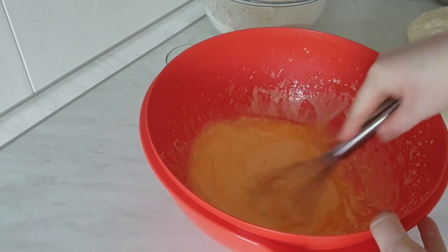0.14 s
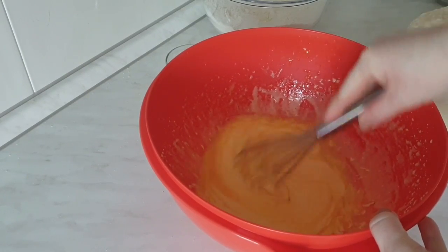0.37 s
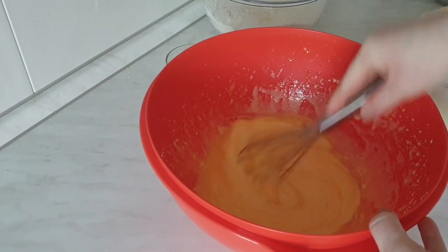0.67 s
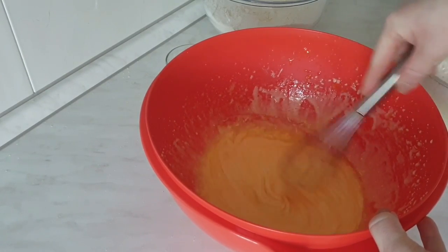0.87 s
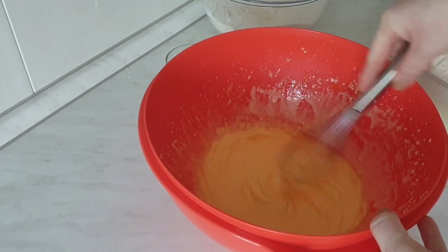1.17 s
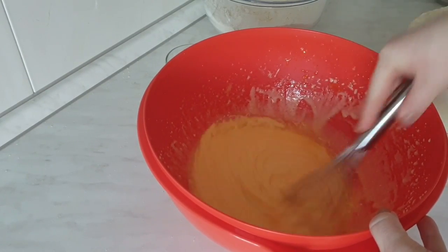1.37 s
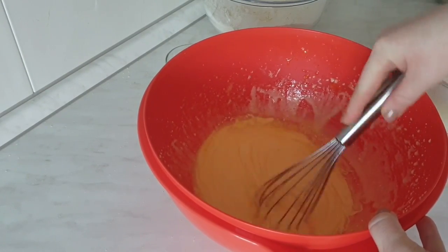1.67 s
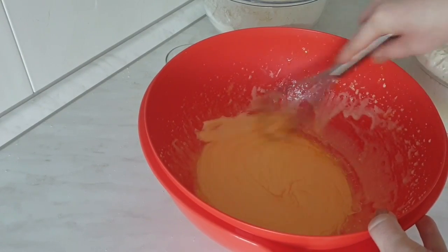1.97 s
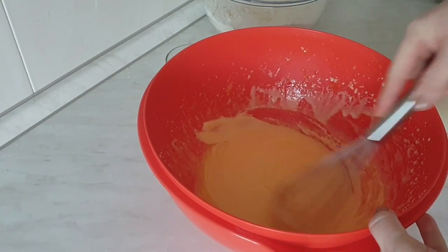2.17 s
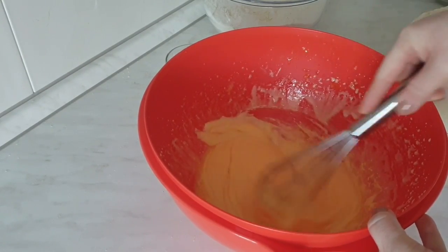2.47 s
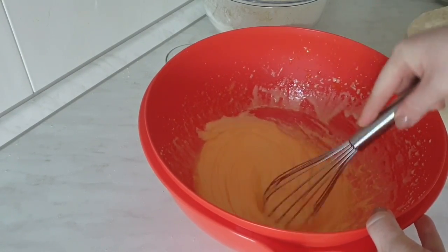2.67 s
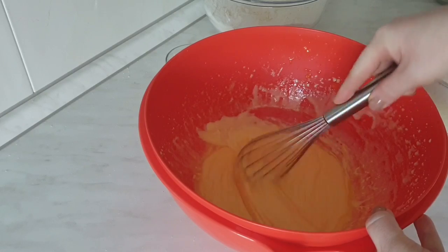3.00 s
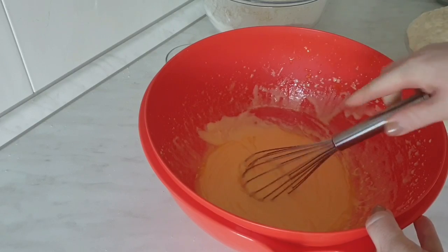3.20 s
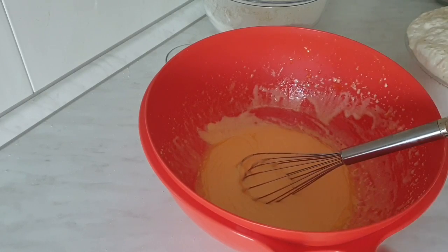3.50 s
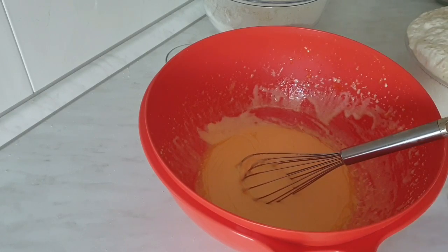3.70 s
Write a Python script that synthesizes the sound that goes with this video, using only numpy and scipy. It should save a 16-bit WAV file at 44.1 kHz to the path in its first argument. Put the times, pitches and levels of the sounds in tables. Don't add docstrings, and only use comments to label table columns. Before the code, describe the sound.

Close stereo pickup in a small, hard-walled kitchen: continuous raspy whisking round a plastic bowl, hollow bumps beneath, then sparse drags and taps, finally a hard double clack as the whisk drops, leaving faint hum.

```python
import sys
import numpy as np
from scipy import signal
from scipy.io import wavfile

SR = 44100
rng = np.random.default_rng(int(sys.argv[2]) if len(sys.argv) > 2 else 0)


def gain_from_decibels(decibels):
    exponent = np.asarray(decibels, float) / 20
    return 10 ** exponent


def master_out(mix):
    frames = np.transpose(np.atleast_2d(mix))
    ceiling = np.clip(frames, -1, 1)
    pcm = np.round(ceiling * 32767).astype(np.int16)
    wavfile.write(sys.argv[1], SR, pcm)


N = 169785

# frequency_hz, level_db, t60_s
BOWL_MODES = [(78, -14.5, 0.42), (135, 1, 0.11), (174.6, -8, .08), (269.7, -11, 0.19), (345, -1, 0.083),
              (409, -1.5, 0.099), (480, 0, 0.046), (1029, -5, 0.082), (721, -6.5, .07), (920.7, 6, 0.033),
              (1214, -5, 0.048), (1472, 7.5, 0.021), (1928, -4.5, 0.042), (2400, -5.5, 0.037)]
# frequency_hz, likeness (1 = identical)
CORRELATION = [(60, 1), (140, 0.8), (250, 1), (600, 0.44), (1500, 0.37), (8000, 0.12)]
# frequency_hz, left_over_right_db
BALANCE = [(60, 0.5), (140, 2.5), (250, -0.5), (600, 2), (3000, 0.5), (15000, 1)]
SIDES = np.array([[1], [-1]])
BAND_EDGES_HZ = 40 * 2 ** np.arange(0, 8.9, .5)


def rms_one(x):
    return x / np.sqrt(np.mean(x ** 2) + 1e-20)


def at_hz(points, hz):
    table = np.array(points)
    return np.interp(np.log(hz), np.log(table[:, 0]), table[:, 1])


def drift(rate_hz):
    pole = np.exp(-80 * np.pi * rate_hz / SR)
    noise = rng.standard_normal(N // 40 + 2002)
    slow = signal.lfilter([1], [1, -2 * pole, pole * pole], noise)[2000:]
    return np.interp(np.arange(N) / 40, np.arange(len(slow)), rms_one(slow))


def ring(x, hz, t60_s):
    radius = gain_from_decibels(-60 / (t60_s * SR))
    angle = 2 * np.pi * hz / SR
    return signal.lfilter([0, np.sin(angle)], [1, -2 * radius * np.cos(angle), radius * radius], x + 1e-18)


def to_sides(mid, side, hz):
    alike = np.clip(at_hz(CORRELATION, hz), -1, 1)
    lean = gain_from_decibels(at_hz(BALANCE, hz) / 2 * SIDES)
    return lean * (np.sqrt(1 + alike) * mid + np.sqrt(1 - alike) * side * SIDES)


def bands(source, gain_db):
    out = 0
    for k, (low, high) in enumerate(zip(BAND_EDGES_HZ, BAND_EDGES_HZ[1:])):
        band = signal.butter(2, [low, high], "band", fs=SR, output="sos")
        mid, side = signal.sosfilt(band, source[k % 2])
        hz = np.sqrt(low * high)
        out = out + gain_from_decibels(gain_db(hz)) * to_sides(mid, side, hz)
    return out


def whisk():
    # touch_s, hardest_s, lift_s, level_db, softer_at_touch_db, softer_at_lift_db
    sweeps = [(-.01, 0, 0.16, -33.5, 0, 3), (.165, .28, 0.35, -31, 0.5, 10),
              (.345, .385, 0.44, -35, -2, -1), (.45, .57, .67, -31, 0, 3.5), (.67, .71, 0.74, -28, 6.5, -1),
              (.765, .86, 0.98, -27.5, 0.5, 15), (.95, 1.035, 1.038, -25.5, 8, -14),
              (1.075, 1.14, 1.23, -24.5, 2, 8.5), (1.23, 1.42, 1.587, -26, 6.5, 10),
              (1.545, 1.585, 1.737, -31, 14, 1), (1.65, 1.70, 1.696, -27.5, 14, -5)]
    drags = [
        (1.947, 1.989, 2.02, -32.5, 2, 2.5),
        (2.014, 2.063, 2.112, -18.5, 6.5, 2.5),
        (2.135, 2.135, 2.196, -25.5, -1, 0),
        (2.401, 2.455, 2.494, -29, -4, 9.5),
        (2.686, 2.721, 2.74, -32.5, -2.5, -3),
        (2.945, 2.982, 3, -29.5, -5.5, 8),
        (3.137, 3.145, 3.1616, -31, -3, 5.5),
        (3.77, 3.792, 4.6, -59, -4, 6),
    ]
    # (s, s, s, dB, dB, dB)
    slides = [
        (3.275, 3.32, 3.354, -49.5, 26, 14.5),
        (3.125, 3.15, 3.177, -42, -2.5, 8.5),
    ]
    # frequency_hz, density_db (per Hz)
    rasp_spectrum = [(59, -55.5), (100, -24), (224, -17), (358, -3), (662, 2.5), (1480, 0.5), (4020, -1.5),
                     (11400, -6), (16000, -15.5)]
    rub_db, slide_rub_db = -11, -9.5
    brightens, flutter_db, patchy_db = 0.31, 1.8, 1.0
    fleck_db, slide_hz = -13, 920

    press = contact(sweeps + drags)
    effort_db = 20 * np.log10(press + 1e-4) + 35
    slips, shared_db = grains(), drift(25)

    def rasp_db(hz):
        brightness = brightens * effort_db * np.log2(hz / 3000) / 2
        patches = patchy_db * drift(11) + flutter_db * drift(30)
        return at_hz(rasp_spectrum, hz) + brightness + shared_db + patches

    def rub_force(k, hz):
        return slips[k % 2, 0] * gain_from_decibels(2.5 * drift(11.7) - 5.8 * (hz < 200))

    rasp = rms_one(bands(slips, rasp_db)) + gain_from_decibels(fleck_db) * flecks()
    rub = rms_one(body(rub_force))
    dull = rms_one(signal.sosfilt(signal.butter(3, slide_hz, fs=SR, output="sos"), rasp))
    strokes = press * (rasp + gain_from_decibels(rub_db) * rub)
    sliding = contact(slides) * (dull + gain_from_decibels(slide_rub_db) * rub)
    return strokes + sliding + flares(slips)


def contact(rows):
    t, edge_s = np.arange(N) / SR, 0.0025
    gain = 0
    for touch, hardest, lift, db, soft_db, eased_db in rows:
        level_db = np.interp(t, [touch, hardest, lift], [db - soft_db, db, db - eased_db])
        gate = np.clip(np.minimum(t - touch, lift - t) / edge_s + .5, 0, 1)
        gain = gain + gain_from_decibels(level_db) * gate
    return gain


def grains():
    shape, slips_per_s, spread_db = (2, 2, N), 7000, 3.0
    sizes = gain_from_decibels(spread_db * np.minimum(rng.exponential(1, shape), 5)) * rng.choice([-1, 1], shape)
    return rms_one(sizes * (rng.random(shape) < slips_per_s / SR))


def flecks():
    per_s, ring_cycles = 400, 45
    pitches_hz = np.geomspace(1710, 5420, 24)
    born = (rng.random(N) < per_s / SR) * gain_from_decibels(2.9 * np.minimum(rng.exponential(1, N), 3))
    dealt = rng.integers(0, 24, N)
    lean = rng.uniform(-1, 1, (2, N))
    out = 0
    for k, hz in enumerate(pitches_hz):
        push = ring(born * lean * (dealt == k), hz, 8 / hz)
        out = out + ring(push, hz, ring_cycles / hz) * hz
    return rms_one(out)


def flares(slips):
    # start_s, length_s, pitch_hz, level_db
    moments = [(0.234, 0.043, 3190, -41.5), (0.552, 0.029, 3040, -35.5), (0.557, 0.017, 1950, -40),
               (0.999, 0.043, 3206, -34), (1.139, 0.046, 4050, -40), (1.159, 0.056, 1920, -44.5),
               (1.328, .16, 3940, -40), (1.397, 0.02, 1440, -40), (1.559, 0.034, 4000, -40),
               (1.939, 0.11, 1370, -32), (2.08, 0.097, 1597, -35), (2.686, 0.031, 4070, -44.5),
               (2.695, 0.0083, 3060, -34), (2.689, 0.02, 640, -38.5), (3.278, 0.13, 1260, -66.5),
               (3.263, 0.17, 2258, -66.5), (0.978, 0.085, 480, -41), (1.25, 0.031, 469, -43.5)]
    sharpness = 21
    out = np.zeros((2, N))
    for s, length, hz, db in moments:
        a, b = int(s * SR), int((s + length) * SR)
        tone = ring(slips[0, :, a:b], hz, sharpness / hz)
        tone = ring(tone, hz, sharpness / hz)
        swell = np.sin(np.linspace(0, 3, b - a)) ** .5
        out[:, a:b] += gain_from_decibels(db) * rms_one(tone) * swell
    return out


def knocks():
    # start_s, peak_db, favoured_pitch_hz, crack_db (against the thud)
    blows = [(.104, -30, 428, -40), (.174, -29, 338, -40), (.455, -35, 460, -27), (.773, -21, 338, -40),
             (1.07, -23, 356, -40), (0.958, -33, 127, -45), (1.074, -29, 135, -45),
             (1.346, -22.5, 158.5, -43), (1.355, -26, 862, -30), (1.655, -19.5, 421, -43),
             (1.66, -32, 135, -45), (1.899, -45.5, 324, -15), (2.056, -16.5, 151, -34),
             (2.389, -29, 1050, -6.5), (2.415, -29, 126, -45), (2.289, -39, 121.4, -45),
             (2.687, -21.5, 644, -14), (2.804, -38.5, 125, -48.5), (2.899, -29, 1000, -7),
             (2.975, -28, 507, -35), (3.098, -27.5, 454, -20.5), (3.144, -28.5, 130, -46),
             (3.3818, -9.5, 950, -8.5), (3.384, -9.5, 151.6, -39), (3.385, -10.5, 409, -39),
             (3.436, -14, 650, -15), (3.459, -20, 80, -53), (3.455, -22.5, 449.3, -31.5),
             (3.49, -32.5, 400, -33.5), (3.798, -50, 2400, -5.5)]
    spot_octaves, spot_widens, spot_loss_db = 0.28, 0.027, 18.5
    knock_db, uneven_db, contact_cycles = -3, 1.5, 3.5
    crack_s, crack_hz = .004, [2000, 12000]

    s, db, spot_hz, crack_db = np.transpose(blows)
    at = (s * SR).astype(int)
    luck_db = rng.normal(0, uneven_db, (len(s), len(BOWL_MODES)))
    wide = spot_octaves + spot_widens * np.clip(db + 21.5, 0, None)

    def force(k, hz):
        clicks = np.zeros(N)
        loss_db = spot_loss_db * np.tanh((np.log2(hz / spot_hz) / wide) ** 2)
        clicks[at] = gain_from_decibels(db + knock_db + luck_db[:, k] - loss_db)
        push = ring(clicks, hz, contact_cycles / hz)
        return push * 2 * np.log(1000) * hz / contact_cycles / SR

    ticks = np.zeros(N)
    ticks[at] = gain_from_decibels(db + crack_db)
    decay = signal.lfilter([1], [1, -np.exp(-1 / (crack_s * SR))], ticks + 1e-18)
    burst = decay * rng.standard_normal((2, N))
    crack = signal.sosfilt(signal.butter(1, crack_hz, "band", fs=SR, output="sos"), burst)
    return body(force) + crack


def body(force):
    out = np.zeros((2, N))
    for k, (hz, db, t60) in enumerate(BOWL_MODES):
        tone = gain_from_decibels(db) * ring(force(k, hz), hz, t60)
        late = np.concatenate([np.zeros(int(SR / hz / 4)), tone])[:N]
        out += to_sides(tone, late * (-1) ** k, hz)
    return out


def kitchen(x):
    # frequency_hz, t60_s
    decay_times = [(100, 0.44), (500, 0.34), (2000, 0.33), (6000, 0.33), (14000, 0.29)]
    # frequency_hz, level_db
    colour = [(60, -6.5), (200, -6.5), (500, -0.5), (2000, 2), (14000, -5)]
    first_echo_s = 0.0019
    t = np.arange(int(.7 * SR)) / SR
    noise = rng.standard_normal((2, 2, len(t)))
    tail = bands(noise, lambda hz: at_hz(colour, hz) - 60 * t / at_hz(decay_times, hz))
    tail = tail * np.clip(t / first_echo_s - 1, 0, 1)
    tail /= np.sqrt(np.sum(tail ** 2) / 2)
    return signal.fftconvolve(x, tail, axes=1)[:, :N]


def house_hum():
    # frequency_hz, density_db (per Hz)
    hum_spectrum = [(40, 2), (75, -3.5), (125, -2), (200, -11.5), (950, -17), (1300, -27), (4800, -42.5),
                    (15000, -29.5)]
    noise = rng.standard_normal((2, 2, N))
    return gain_from_decibels(-62.5) * rms_one(bands(noise, lambda hz: at_hz(hum_spectrum, hz)))


def scene():
    wires, blows = whisk(), knocks()
    room_db, knock_room_db = -2.5, -7
    tail = kitchen(gain_from_decibels(room_db) * wires + gain_from_decibels(knock_room_db) * blows)
    return wires + blows + tail + house_hum()


def roll_off(x):
    return signal.sosfilt(signal.butter(12, 16670, fs=SR, output="sos"), x)


def record(dry):
    low_hz, high_hz, ceiling = 94, 15700, .97
    x = signal.sosfilt(signal.butter(3, low_hz, "high", fs=SR, output="sos"), dry)
    rounded = x / (1 + (x / ceiling) ** 8) ** .125
    mix = signal.sosfilt(signal.cheby2(10, 50, 1.07 * high_hz, fs=SR, output="sos"), rounded)
    return roll_off(mix)


dry = scene()
out = record(dry)
master_out(out)
```